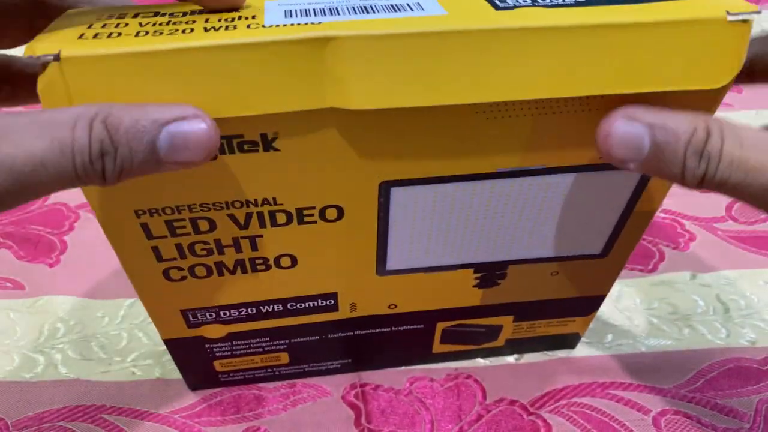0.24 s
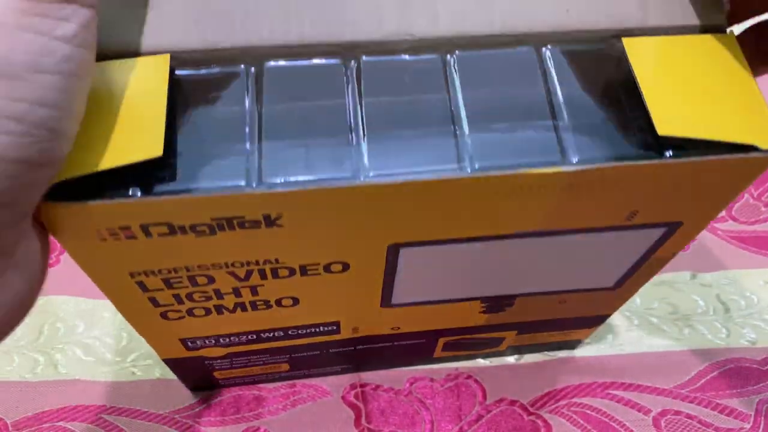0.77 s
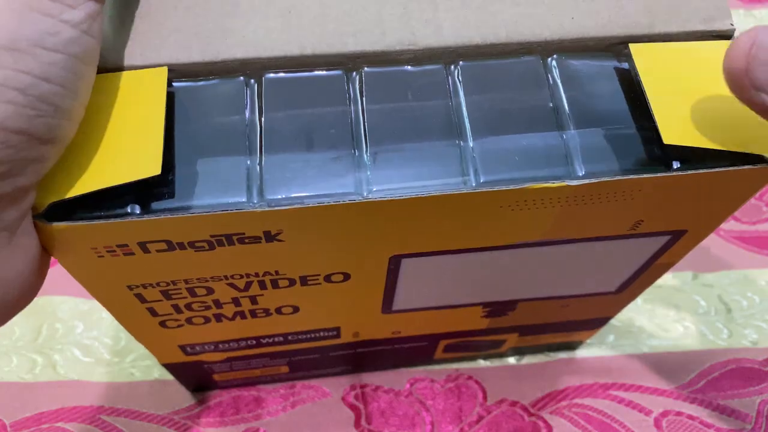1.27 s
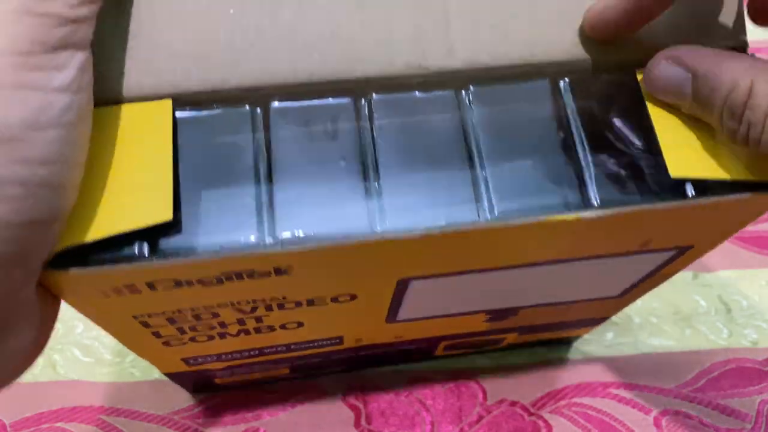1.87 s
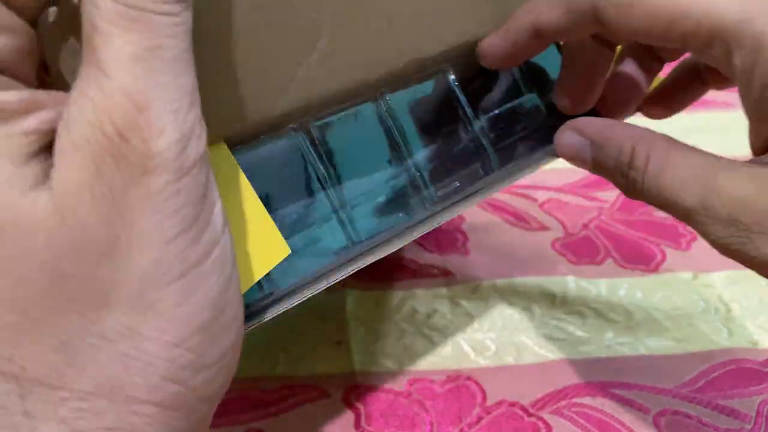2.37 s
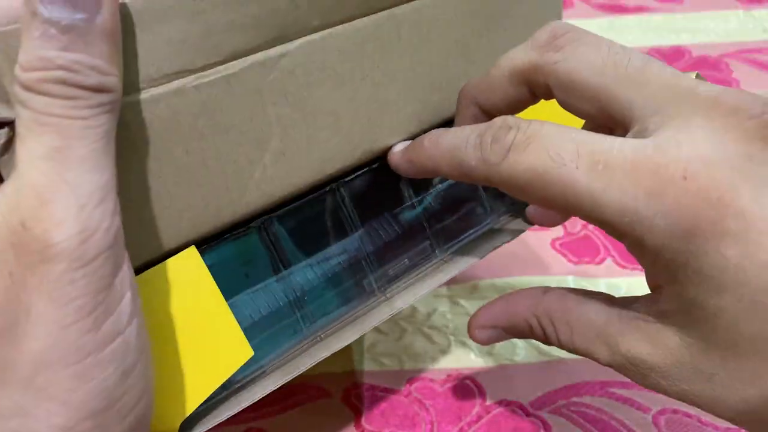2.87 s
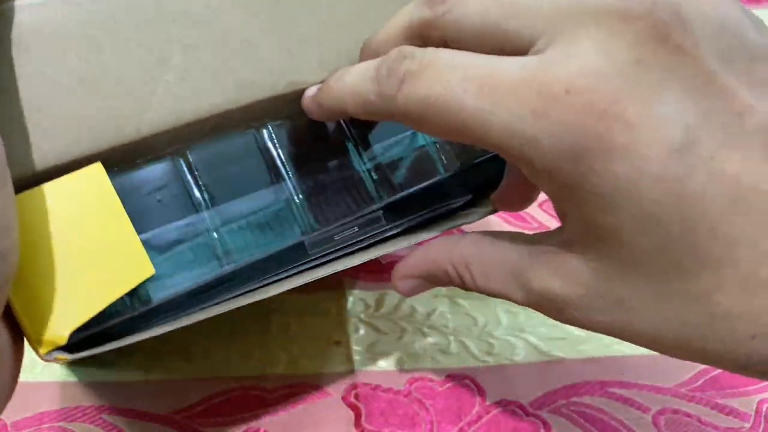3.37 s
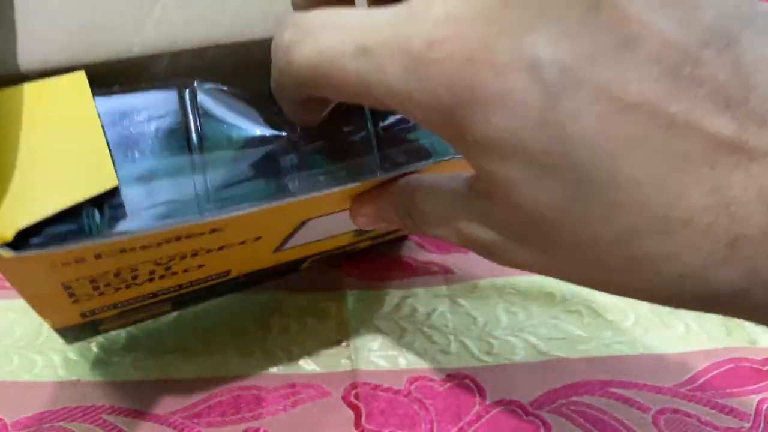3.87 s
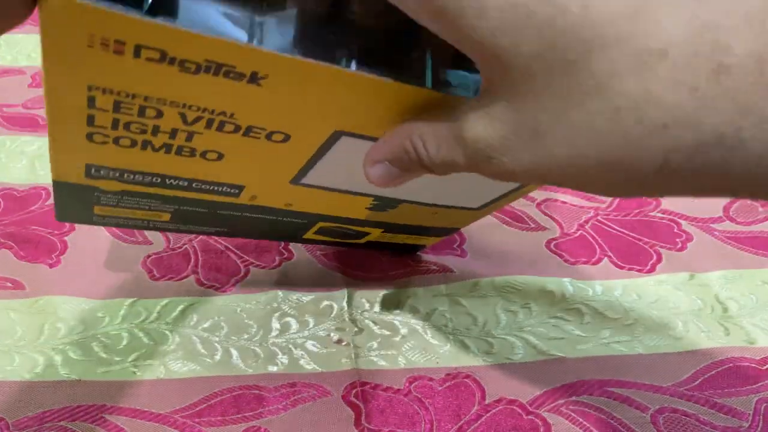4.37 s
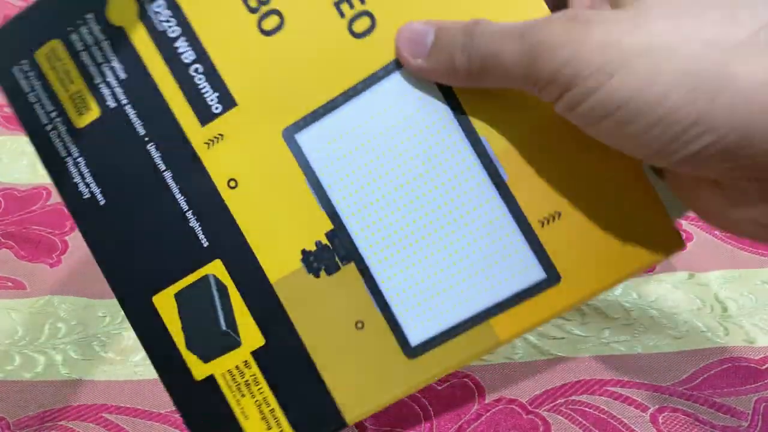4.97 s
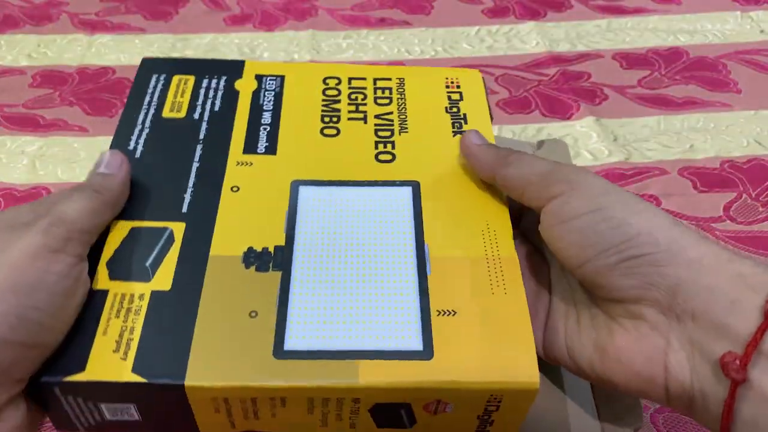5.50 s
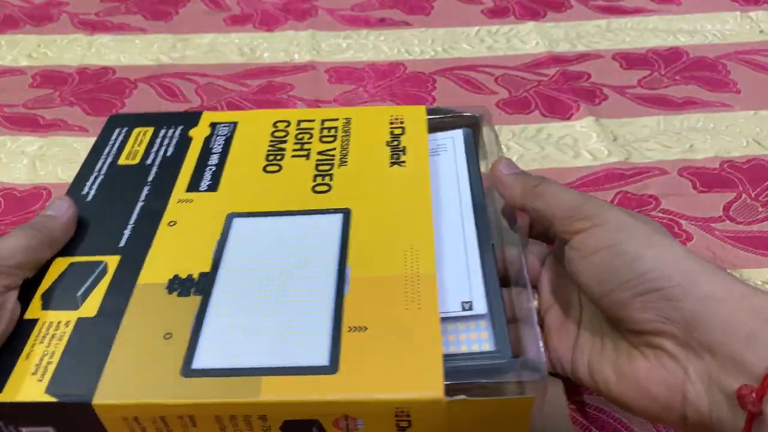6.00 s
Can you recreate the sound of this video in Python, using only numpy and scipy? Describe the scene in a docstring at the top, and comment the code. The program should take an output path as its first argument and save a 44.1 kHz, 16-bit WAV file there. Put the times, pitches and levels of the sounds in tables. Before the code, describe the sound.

A cardboard package is handled indoors at close range. The first half is very quiet: soft skin rubs, faint squeaky scratches and small clicks over low room tone. One hollow tap rings the box, then scuffing leads into bright, irregular cracks of flexing thin plastic, far louder than the rest. It calms to dull bumps, then ends with two brief rasping slides and hollow snaps, with a short room echo.

```python
"""Hands open a cardboard box with a thin plastic tray, close to a microphone in a small, faintly hissing room.
First come soft finger strokes, shaped noise and tiny slips, with short squeaky scratches, faint snaps and ticks.
From 2.6 s dull blows ring the box; near 3.8 s the tray starts to buckle in sharp snaps: damped ringing.
Near 6 s the tray slides along the cardboard in two pulls, brighter as it speeds up, among the last snaps.
The room answers all of these but the ticks, with scattered echoes, a fading tail and a few lingering tones."""
import sys
import numpy as np
from scipy import signal
from scipy.fft import rfft, irfft
from scipy.io import wavfile
from scipy.ndimage import uniform_filter1d

SR = 44100
rng = np.random.default_rng(int(sys.argv[2]) if len(sys.argv) > 2 else 0)


def bounce(signal):
    """Save signal as a 16-bit WAV file at the path given by the first command-line argument."""
    frames = np.transpose(np.atleast_2d(signal))
    limited = np.clip(frames, -1, 1)
    pcm = np.round(limited * 32767).astype(np.int16)
    wavfile.write(sys.argv[1], SR, pcm)


N = 275228
TIME = np.arange(N) / SR
BANDS = 2 ** np.arange(5, 14.2, .25)  # band centres in Hz, a quarter octave apart
# how long the bands of a plastic sheet ring before falling by 60 dB: f/Hz, t60/s
SHEET_T60 = [(150, 0.022), (550, 0.12), (1300, 0.047), (4000, 0.029), (12000, 0.01)]


def undb(db):
    """Turn decibels into a gain."""
    return 10 ** (np.asarray(db) / 20)


def at_hz(points, hz):
    """Read a value between (f/Hz, value) points, on a logarithmic pitch axis."""
    f, value = np.transpose(points)
    return np.interp(np.log(np.maximum(hz, 1)), np.log(f), value)


def unit(x):
    """Scale to a total energy of one."""
    return x / np.sqrt(np.sum(x ** 2, axis=-1, keepdims=True))


def steady(x):
    """Scale to a standard deviation of one."""
    return x / np.std(x)


def colour(x, points):
    """Filter a signal with a smooth curve of (f/Hz, gain/dB) points, then scale its overall level to one."""
    gain = undb(at_hz(points, np.fft.rfftfreq(N, 1 / SR)))
    return steady(irfft(rfft(x) * gain, N))


def add(out, s, sound):
    """Mix a sound in at time s, in seconds."""
    i = max(int(s * SR), 0)
    out[i:i + len(sound)] += sound[:N - i]


def fade(t, t60):
    """Die away exponentially, by 60 dB in t60 seconds."""
    return np.exp(-np.log(1000) * t / t60)


def background():
    """A low room tone and a narrow band of thin hiss, both steady shaped noise."""
    # the quiet room with the microphone's own hiss: f/Hz, level/dB per Hz
    room_tone = [(18, -18), (30, -8.5), (53, -16.5), (109, -9), (145, -2.5), (311, -5), (470, -8),
                 (900, -11), (1500, -17), (2540, -27), (4500, -35.5), (6550, -39.5), (11000, -41),
                 (16000, -41.5)]
    tone_db, whine_db = -60, -79
    tone = colour(rng.standard_normal(N), room_tone)
    whine = colour(rng.standard_normal(N), [(6300, -37.5), (7150, -8.5), (7800, -5.5), (8400, -34)])
    return undb(tone_db) * tone + undb(whine_db) * whine


def slips(rate, spread_db):
    """Stick and slip: tiny releases at random moments (rate per second), of very unequal size."""
    size = undb(spread_db * np.clip(rng.standard_normal(N), -2, 2))
    happens = rng.random(N) < rate / SR
    return happens * size * rng.choice([-1, 1], N)


def box_walls(catches, column):
    """Slips ring the cardboard; where the touch sits decides which resonances speak."""
    # box walls under a rubbing touch: f/Hz, width/Hz, level under a finger/dB, level under the gliding tray/dB
    box_modes = [(435, 270, 3, -9), (620.4, 100, -2.5, -2), (863.5, 38, -2, -13), (1110, 680, -3, 15),
                 (1670, 110, -7, -3), (2450, 130, -18, -1.5)]
    t = TIME[:SR // 10]
    ring = np.zeros(len(t))
    for k, (hz, width, *gains) in enumerate(box_modes):
        strength = undb(gains[column]) * np.sqrt(width) * (-1) ** k  # neighbours push in opposite directions
        ring += strength * np.sin(2 * np.pi * hz * t) * np.exp(-np.pi * width * t)  # wider means shorter
    rung = signal.fftconvolve(catches, ring)[:N]
    return colour(rung, [(25, -47.0), (80, -21.0), (300, -5.5), (600, 10.5), (2200, 2.0), (5000, -13.5)])


def rubbing(drag, rasp, hiss, column):
    """Slips drum on the box walls, fibres rasp, and the gliding surface hisses."""
    # fibres catching: f/Hz, level/dB per Hz
    rasp_spectrum = [(900, -24.5), (2000, 4.5), (2700, 9), (3400, 7), (4500, 1.5), (5800, -22),
                     (9000, -33.5)]
    # a surface gliding: f/Hz, level/dB per Hz
    hiss_spectrum = [(3500, -18), (6500, -3.5), (8500, 3), (10500, 3.5), (13000, 0), (16000, -3.5)]
    catches = steady(slips(rate=480, spread_db=1.5))
    # ridges catch now and then and bunch the grit into short crackles, each fading over about 1.5 ms
    ridge_hits = np.abs(slips(rate=110, spread_db=4))
    ridges = signal.lfilter([1], [1, -np.exp(-1 / (.0015 * SR))], ridge_hits)
    grit = steady((.45 + ridges) * rng.standard_normal(N)) + .5 * catches
    walls = drag * box_walls(catches, column)
    return walls + rasp * colour(grit, rasp_spectrum) + hiss * colour(grit, hiss_spectrum)


def finger_strokes():
    """Fingers stroke the box: each stroke takes hold, drags evenly and lets go."""
    # one stroke per row: start t/s, length/s, drag on the walls/dB, skin hiss/dB
    strokes = [(0.14, 0.077, -58.5, -76), (0.26, 0.21, -67, -87), (0.532, .23, -84, -80),
               (0.834, 0.1, -67, -80), (1.13, .15, -78, -87), (1.413, .17, -78, -82),
               (1.666, 0.57, -67, -78), (2.192, 0.38, -68, -83), (3.315, 0.062, -56.5, -83),
               (3.423, 0.34, -57.5, -78), (3.538, 0.074, -43.5, -59), (3.583, 0.15, -45.5, -71),
               (3.697, 0.122, -44, -71), (3.836, 0.17, -47, -74), (4.25, 0.11, -55, -70.5),
               (4.528, 0.085, -55, -86), (4.674, 0.12, -52, -77), (4.932, 1, -65.5, -83.5)]
    attack_s, release_s = 0.017, 0.082
    rasp_db = -19  # fibres against the drag
    drag, hiss = np.zeros(N), np.zeros(N)
    for s, length, drag_db, hiss_db in strokes:
        touch = np.clip(np.minimum((TIME - s) / attack_s, (s + length - TIME) / release_s), 0, 1)
        # overlapping strokes add their energies
        drag = np.hypot(drag, undb(drag_db) * touch)
        hiss = np.hypot(hiss, undb(hiss_db) * touch)
    return rubbing(drag, undb(rasp_db) * drag, hiss, column=0)


def near_surfaces(x, scatter_db=-15, slap_db=-16):
    """Table and furniture scatter a little at once; the nearest wall returns one dull slap."""
    wall_s = .029
    t = TIME[:int(wall_s * SR)]
    scatter = unit(rng.standard_normal(len(t)) * (t > .007))  # random echoes after 7 ms
    softened = signal.sosfilt(signal.butter(1, 8000, fs=SR, output="sos"), x)
    out = undb(scatter_db) * signal.fftconvolve(softened, scatter)[:N]
    dull = signal.sosfilt(signal.butter(1, 2200, fs=SR, output="sos"), x)
    add(out, wall_s, undb(slap_db) * dull)
    return out


def diffuse_tail(x, delay_s):
    """The room stores each pitch's energy and lets it die away; the box keeps moving, so phases are random."""
    # how long the room rings: f/Hz, t60/s
    room_t60 = [(70, .5), (250, .45), (550, 0.27), (1400, 0.44), (4000, 0.36), (10000, 0.34), (16000, 0.24)]
    # how strongly the room is fed: f/Hz, level against the direct sound/dB
    room_wet = [(70, -9.5), (250, -8.5), (700, -9), (1400, -10.5), (3500, -6), (9000, -11.5),
                (15000, -14.5)]
    size, hop = 512, 128  # analysis window and step, in samples
    hz, _, sound = signal.stft(x, SR, nperseg=size, noverlap=size - hop)
    keep = fade(hop / SR, at_hz(room_t60, hz)) ** 2  # share of energy left after one step
    energy = uniform_filter1d(np.abs(sound) ** 2, 3, axis=0)  # blurred over neighbouring pitches
    fed = energy * undb(at_hz(room_wet, hz))[:, None] ** 2
    stored = np.array([signal.lfilter([1 - k], [1, -k], row) for k, row in zip(keep, fed)])
    # random noise carries the stored energy
    field = steady(signal.stft(rng.standard_normal(N), SR, nperseg=size, noverlap=size - hop)[2])
    tail = signal.istft(field * np.sqrt(np.abs(stored)), SR, nperseg=size, noverlap=size - hop)[1]
    out = np.zeros(N)
    add(out, delay_s, tail)
    return out


def lingering(x, share_db):
    """A few narrow resonances ring on in sympathy."""
    # faint tones that linger: f/Hz, level before the common share/dB, t60/s
    linger = [(73, -3.5, 0.46), (582, -9.5, 0.25), (878, -14.5, 0.33), (1249, -11.5, 0.45),
              (1315, -11.5, .35), (1820, -13, .4), (2320, -12, .35), (2392, -13.5, 0.46), (2534, -9, .42),
              (2670, -7.5, .42), (2930, -13.5, .4)]
    t = TIME[:SR // 2]
    tones = sum(undb(db) * unit(np.sin(2 * np.pi * hz * t) * fade(t, t60)) for hz, db, t60 in linger)
    return undb(share_db) * signal.fftconvolve(x, tones)[:N]


def room(x):
    """The room's answer: early scatter, a diffuse tail and a few lingering tones."""
    return near_surfaces(x) + diffuse_tail(x, delay_s=.013) + lingering(x, share_db=-25)


def scratches():
    """Fingertips scratch flaps and plastic: quick slips ring one narrow, high resonance of the sheet."""
    # one scratch per row: t/s, length/s, level/dB, squeak f/Hz
    scratch_rows = [(0.151, .03, -76, 4100), (0.39, 0.086, -75, 3020), (0.855, 0.15, -78, 3700),
                    (3.527, 0.061, -64.5, 4240), (3.602, 0.093, -69.5, 4390), (3.709, 0.026, -63, 4460),
                    (4.55, 0.053, -61.5, 4550), (4.675, 0.044, -56.5, 4740)]
    out = np.zeros(N)
    for s, length, db, hz in scratch_rows:
        size = int(length * SR)
        squeak_band = signal.butter(2, [hz * .88, hz * 1.12], "band", fs=SR, output="sos")
        catches = slips(rate=2500, spread_db=6.5)[:size]
        squeak = steady(signal.sosfilt(squeak_band, catches))
        add(out, s, undb(db) * squeak * signal.windows.tukey(size, .5))
    return out


def band_noise(size):
    """One row of random noise for each quarter-octave band."""
    f = np.fft.rfftfreq(size, 1 / SR)
    away = np.abs(np.log2(np.maximum(f, 1) / BANDS[:, None])) * 4  # distance from the centre, in bands
    phase = 2 * np.pi * rng.random(away.shape)
    return irfft(np.sqrt(np.maximum(1 - away, 0)) * np.exp(1j * phase), size)


def blow(band_db, t60, ring_hz, ring_db, ring_t60, rise_cycles, contact_s):
    """A crowd of damped bending modes and one leading ring; bending waves bring the treble first."""
    t = np.arange(8192) / SR
    swell = (1 - np.exp(-t / (contact_s + rise_cycles / BANDS[:, None]))) ** 2  # low bands rise more slowly
    decay = fade(t, at_hz(t60, BANDS)[:, None])
    crowd = undb(band_db) @ unit(band_noise(size=len(t)) * swell * decay)
    ring_swell = (1 - np.exp(-t / (contact_s + 1.4 / ring_hz))) ** 2
    ring = np.sin(2 * np.pi * ring_hz * t) * ring_swell * fade(t, ring_t60)
    return (crowd + undb(ring_db) * unit(ring)) * np.sqrt(.01 * SR)  # 0 dB: rms one if spread over 10 ms


def tray_snaps(ring_cycles=40):
    """A tray panel flips over with crack and fizz; the box around it adds a hollow note."""
    # one snap per row; the dull one at 3.8492 is the wall's slap after the snap at 3.8219:
    # t/s, level/dB, panel ring f/Hz, then against the level: ring/dB, hollow/dB, crack/dB, fizz/dB
    snaps = [ (0.3078, -65.5, 508, 12, 17.5, 4, 4.5), (.3587, -70, 1320, -8, -4, 9, 8),
             (0.724, -66.5, 1250, 0, -10, 4, 3), (0.9406, -61, 1360, -1, -5, -18, 0),
             (2.718, -71.5, 1500, 2, 0, 9, 15), (3.7996, -23, 1434, -1.5, 2, 10, 5.5),
             (3.8219, -19.5, 1500, -15, -1, 2, 7.5), (3.8492, -26, 1640, -19, -4, -4, -14),
             (4.0345, -23.5, 1404, -6.5, -1, -3, -4), (4.3049, -24.5, 1297, -2.5, -2, 5, -1),
             (4.4247, -25, 487, -1, -7, -5.5, -2.5), (4.511, -36.5, 1022, 5, 7, -11, -28),
             (4.587, -49.5, 843, 2.5, -1, 0.5, -11), (4.607, -59.5, 880, 5, 8, 9.5, -2),
             (4.7644, -27, 1363, -3, -3.5, 2, -10), (4.8002, -32, 998, -3.5, -1.5, 4, 2),
             (4.8805, -48.5, 4330, 0.5, 3, 6, 6.5), (5.952, -36, 1023, 11, -10.5, -15, -3),
             (6.011, -41, 1150, 0, 5.5, 6, 7), (6.055, -36.5, 1050, -2, -7, -10, -7),
             (6.146, -65, 2590, -3, 1, 1, 12), (6.1544, -33.5, 849, 7, -1, 0.5, -47),
             (6.162, -41.5, 860, 10, -21, -2, -18)]
    # what a snap sets ringing in the plastic sheet: f/Hz, level/dB per quarter octave
    sheet = [(60, -51.5), (120, -47.5), (200, -25.5), (330, -21), (540, -9.5), (1000, -9), (1400, -3.5),
             (1850, -9.5), (2450, -10), (3200, -16.5), (4500, -14.5), (6300, -19), (9500, -14.5),
             (14000, -23), (16500, -36)]
    out = np.zeros(N)
    for s, db, hz, ring_db, hollow_db, crack_db, fizz_db in snaps:
        tilt = at_hz([(600, hollow_db), (1000, 0), (1900, 0), (3200, crack_db), (5000, crack_db),
                      (8000, fizz_db)], BANDS)
        ring_t60 = min(ring_cycles / hz, .045)
        snap = blow(at_hz(sheet, BANDS) + tilt, SHEET_T60, hz, ring_db, ring_t60,
                    rise_cycles=.45, contact_s=.00006)
        add(out, s, undb(db) * snap)
    return out


def near_ticks():
    """Small high ticks, brief ringing blows so close to the microphone that no room answer is added."""
    # one tick per row: t/s, level/dB, ring f/Hz, ring against the level/dB
    ticks = [(0.441, -60, 3320, 1), (0.939, -64.5, 3680, 2), (5.170, -54, 3350, 2)]
    # what a tick sets ringing: f/Hz, level/dB per quarter octave
    tick_spectrum = [(1500, -21), (2700, -17), (3500, -7), (5000, -20), (8000, -16), (12000, -38)]
    out = np.zeros(N)
    for s, db, hz, ring_db in ticks:
        tick = blow(at_hz(tick_spectrum, BANDS), SHEET_T60, hz, ring_db,
                    ring_t60=0.0054, rise_cycles=0.37, contact_s=.0001)
        add(out, s, undb(db) * tick)
    return out


def box_blows():
    """Fingers and table meet the box, a stroke takes hold, the sliding tray catches: dull blows ring the card."""
    # one ringing part of a blow per row; the first two rows make a single knock with two rings:
    # t/s, level/dB, wall ring f/Hz, then against the level: ring/dB, thud/dB, edge/dB, scuff/dB;
    # last, contact time/s
    blow_rows = [ (2.636, -37, 988, 2.5, 17, -5, -21, 0.00018),
                 (2.638, -37, 325, 2.5, 16, -9, -10.5, .0003), (2.736, -63.5, 85, 12, 6, -9, -8, .002),
                 (2.957, -61, 550, 0, 11, 8, 5, 0.0019), (3.446, -47.5, 568, 3, -15, -20, -19, .002),
                 (3.560, -36, 586, -1.5, 3.5, -13.5, -5, .003),
                 (3.587, -33.5, 1610, -6.5, 6.5, 0.5, 1, 0.00024),
                 (3.597, -42.5, 393, 10, 5, -14, -8, .0007), (3.643, -46, 1760, 2, -6, 7, 4.5, 0.0016),
                 (3.712, -34.5, 1686, -1.5, -3.5, 1.5, 3, .0008), (3.741, -64, 79, 5, 12, 0, -4.5, .003),
                 (4.682, -55.5, 565, -1.5, 12, 19, 12.5, 0.0017),
                 (4.908, -50, 721, -12, -0.5, 0, 11.5, 0.00053),
                 (4.995, -55.5, 559, 9, -5, -1, -11.5, .0009),
                 (5.088, -54, 539, -3, -13.5, -1.5, 1, 0.00054), (5.24, -53, 308, 3, 23.5, -11, 8.5, .0005),
                 (5.334, -53, 208.5, 11, 3.5, 8, -0.5, .001),
                 (5.676, -52.5, 506, -4.5, 5.5, -0.5, -5.5, 0.00043),
                 (5.838, -49, 855, 6.5, 8.5, 12, 9.5, 0.00056), (5.88, -60, 956, 15, -12, 15, -5, .0004)]
    # what a blow sets ringing in the cardboard: f/Hz, level/dB per quarter octave
    card = [(35, -49.5), (75, -31.5), (130, -29.5), (220, -26), (370, -14.5), (600, -1.5), (950, -11.5),
            (1600, -14.5), (2600, -25.5), (4400, -27.5), (6500, -44.5), (10000, -37.5), (16000, -36.5)]
    # how long the cardboard rings: f/Hz, t60/s
    card_t60 = [(70, 0.11), (200, 0.24), (600, 0.053), (1500, 0.11), (8000, 0.052)]
    out = np.zeros(N)
    for s, db, hz, ring_db, thud_db, edge_db, scuff_db, contact_s in blow_rows:
        tilt = at_hz([(150, thud_db), (300, 0), (700, 0), (1100, edge_db), (3000, scuff_db)], BANDS)
        dull_blow = blow(at_hz(card, BANDS) + tilt, card_t60, hz, ring_db,
                         ring_t60=0.028, rise_cycles=0.4, contact_s=contact_s)
        add(out, s, undb(db) * dull_blow)
    return out


def tray_slide():
    """Each pull of the tray gathers speed and slows again; the faster it glides, the brighter it sounds."""
    # one pull per row: fastest at t/s, speeding up/s, slowing down/s, level/dB
    pulls = [(6.014, .15, 0.086, -37), (6.189, 0.025, 0.021, -38)]
    rasp_db, hiss_db = -11.5, -12  # against the drag, at full speed
    rasp_power, hiss_power = 1.7, 3  # drag grows in step with speed, these with powers of it
    drag, rasp, hiss = np.zeros((3, N))
    for s, rise_s, fall_s, db in pulls:
        speed = np.exp(-((TIME - s) / np.where(TIME < s, rise_s, fall_s)) ** 2)
        drag = drag + undb(db) * speed
        rasp = rasp + undb(db + rasp_db) * speed ** rasp_power
        hiss = hiss + undb(db + hiss_db) * speed ** hiss_power
    return rubbing(drag, rasp, hiss, column=1)


def scene():
    """Tray, box and hands in the room."""
    direct = tray_snaps() + box_blows() + finger_strokes() + tray_slide() + scratches()
    return (direct + room(direct) + near_ticks() + background())[None]


def record(dry, bass_cut_hz=52, top_hz=16000):
    """The phone drops the deep bass and cuts the top."""
    thin = signal.sosfilt(signal.butter(4, bass_cut_hz, "high", fs=SR, output="sos"), dry)
    return signal.sosfilt(signal.ellip(10, .2, 70, top_hz, fs=SR, output="sos"), thin)


dry = scene()
out = record(dry)
bounce(out)
```